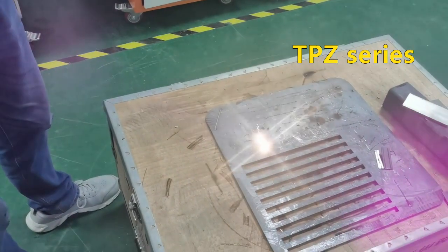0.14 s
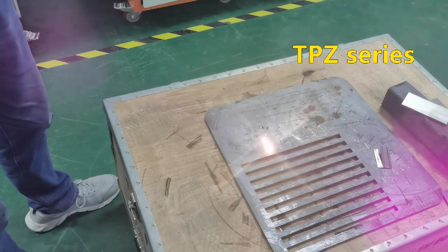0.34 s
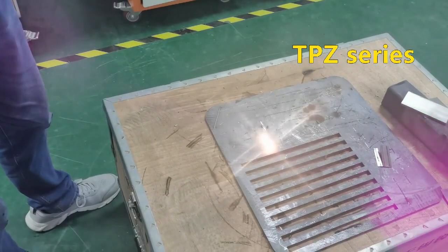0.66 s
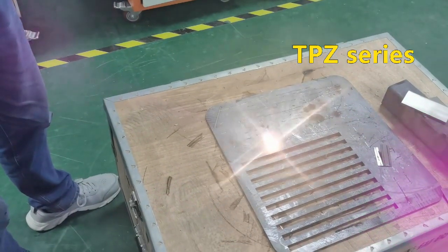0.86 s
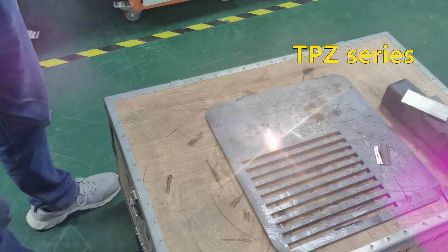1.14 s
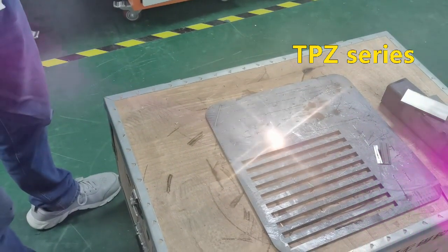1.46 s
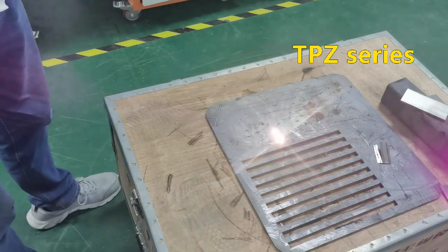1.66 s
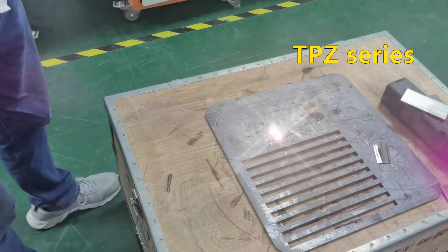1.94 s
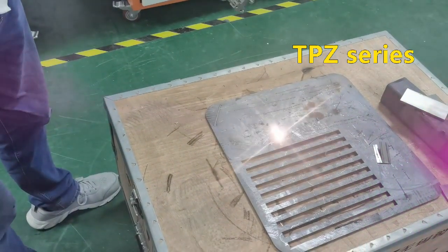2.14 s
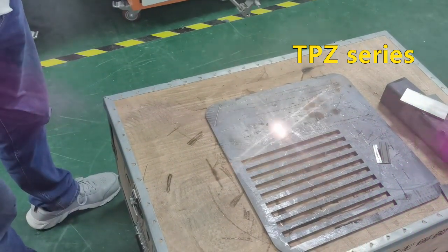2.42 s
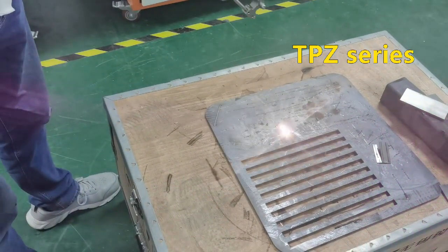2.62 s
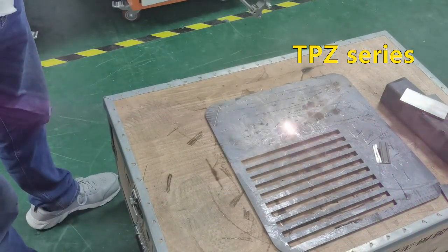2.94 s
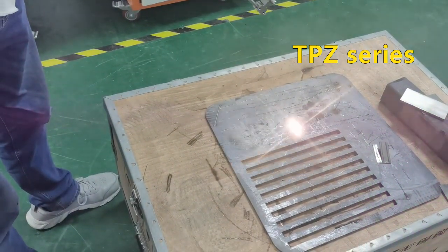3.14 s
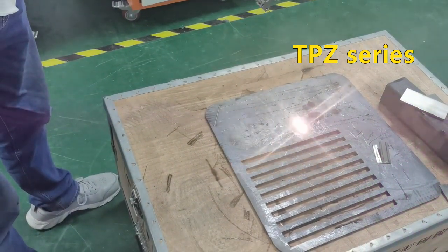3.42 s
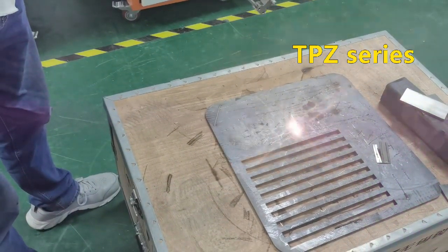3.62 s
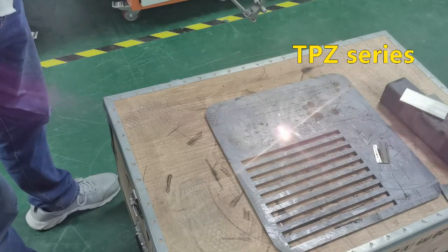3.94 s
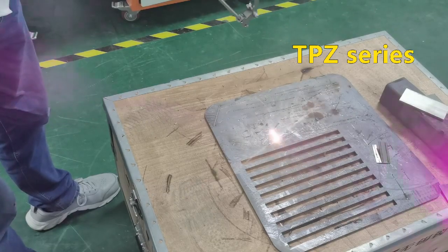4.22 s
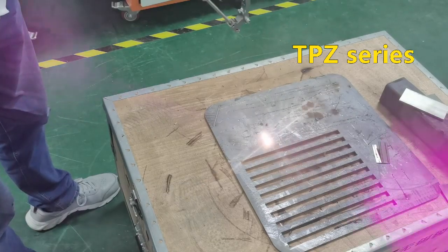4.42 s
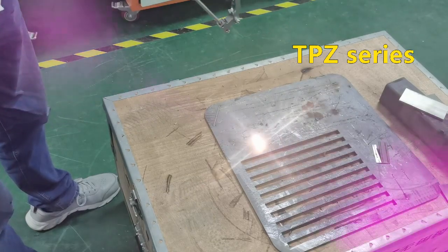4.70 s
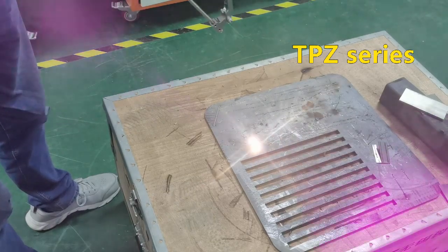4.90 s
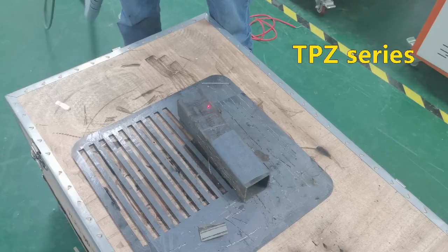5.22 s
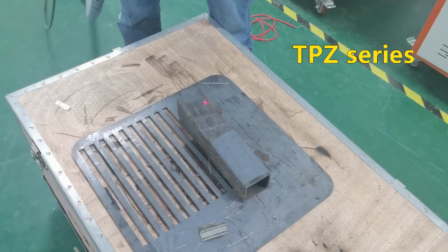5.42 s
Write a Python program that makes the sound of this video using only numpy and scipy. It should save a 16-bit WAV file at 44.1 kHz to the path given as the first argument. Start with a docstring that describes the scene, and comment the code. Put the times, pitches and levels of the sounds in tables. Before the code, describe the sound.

The sound begins mid-action with a handheld laser cleaner burning rust from a steel plate: a loud, bright, piercing sizzle around the upper treble. Its nearly repeating crackle gives it a raspy, buzzing pitch near 500 hertz, while a wavering whine sounds on multiples of that, strongest around 1 and 2 kilohertz with higher tones coming and going. From 0 to about 2.4 seconds, short flares spit and jump out, clustered near 0.9 to 1.7, with stronger bursts at 2.15 and 2.35. The burn gradually weakens and turns breathier, softest near 3.3, with a small spit at 3.8. At about 4.1 seconds it cuts off abruptly with a tiny fading tail. Quiet workshop ambience remains: deep mains hum, faint fan tones and dull air noise. Small dry ticks fall near 4.2, 4.6 (clearest), 4.7, 4.8, 5.0 and 5.5. Stereo, dry, with crisp treble.

```python
"""In a workshop, a handheld laser cleaner sweeps its beam along a line on a rusty steel plate, about 500 times
a second. Every sweep meets nearly the same rust, so the burning noise nearly repeats and the crackle sings;
the turns of the beam add a whine of low multiples of the sweep rate. The sound then cuts away from the laser,
with a brief fading tail, to another spot in the workshop: mains hum, fan tones, air noise and a few dry ticks
of decaying noise, all heard by a pair of microphones."""
import sys
import numpy as np
from scipy import signal
from scipy.fft import rfft, irfft, next_fast_len
from scipy.io import wavfile
from scipy.ndimage import uniform_filter1d, map_coordinates

SR = 44100
rng = np.random.default_rng(int(sys.argv[2]) if len(sys.argv) > 2 else 0)


def bounce(signal):
    """Save signal as a 16-bit WAV file at the path given by the first command-line argument."""
    frames = np.transpose(np.atleast_2d(signal))
    limited = np.clip(frames, -1, 1)
    pcm = np.round(limited * 32767).astype(np.int16)
    wavfile.write(sys.argv[1], SR, pcm)


def how_loud(loudness_db):
    """Turn decibels into a plain amplitude multiplier (0 dB gives 1, 20 dB gives 10)."""
    steps = np.asarray(loudness_db, float) / 20
    return 10 ** steps


N = 245195
SWEEP_HZ = 498.1
SWEEPS = int(N * SWEEP_HZ / SR) + 2  # rows in a map of the plate
CELLS = 64  # independent places along the line
SIDES = np.array([[0.5], [-0.5]])  # halves a left-right difference between the microphones


def unit(x):
    """Normalization: scales a signal to rms 1."""
    return x / np.sqrt(np.mean(x ** 2) + 1e-20)


def along(points, hz):
    """Log-frequency interpolation of (frequency [Hz], value) points."""
    f, v = np.transpose(points)
    return np.interp(np.log(hz + 1), np.log(f + 1), v)


def curves(rows):
    """Linear interpolation in time: one value per sample for each column after the time."""
    s, *columns = np.transpose(rows)
    return [np.interp(np.arange(N) / SR, s, column) for column in columns]


def wobble(rate):
    """Slow random modulation: a smooth curve through rate random knots a second."""
    knots = rng.standard_normal(int(N * rate / SR) + 4)
    return map_coordinates(knots, [np.arange(N) * rate / SR])


def filtered(x, response):
    """Linear filtering: multiplies the spectrum by a complex response of frequency."""
    m = next_fast_len(N + 8192)
    return irfft(rfft(x, m) * response(np.fft.rfftfreq(m, 1 / SR)), m)[..., :N]


def peak(hz, centre_hz, width_hz):
    """Simple resonance: the causal response of one damped mode, 1 at its centre."""
    return 1j * hz * width_hz / (centre_hz ** 2 - hz ** 2 + 1j * hz * width_hz)


def spread(pair, spectrum, alike):
    """Interchannel coherence: two unrelated signals, coloured and mixed to a left-right likeness; rms 1."""
    def mid_side(hz):
        turn = np.arccos(np.clip(along(alike, hz), -1, 1)) / 2
        return how_loud(along(spectrum, hz)) * [np.cos(turn), np.sin(turn)]

    mid, side = filtered(pair, mid_side)
    return unit(np.array([mid + side, mid - side]))


def blurred(x, length, axis):
    """Spatial correlation: a running mean taken twice, scaled to rms 1."""
    size = max(round(length), 1)
    once = uniform_filter1d(x, size, axis, mode="wrap")
    return unit(uniform_filter1d(once, size, axis, mode="wrap"))


def swept(surface):
    """Scanning: the beam reads a map of (sweep number, place on the line), one row per sweep."""
    sweeps = np.arange(N) * SWEEP_HZ / SR
    closed = np.hstack([surface, surface[:, :1]])
    return map_coordinates(closed, [sweeps, sweeps % 1 * surface.shape[1]], order=1)


def texture(memory_s):
    """Near-periodic noise: fine rust grain along the line, renewed as the hand moves on."""
    grain = blurred(rng.standard_normal((SWEEPS, CELLS)), memory_s * SWEEP_HZ, axis=0)
    return unit(swept(signal.resample(grain, 512, axis=1)))


def snap():
    """Pulse train: one sharp pressure drop where the mirror turns, its size drifting from sweep to sweep."""
    sizes = how_loud(3.7 * blurred(rng.standard_normal((SWEEPS, 1)), 3, axis=0))
    drops = -sizes * np.eye(1, CELLS)
    return unit(swept(signal.resample(drops, 512, axis=1)))


def flares(shared, flare_db, turn_db):
    """Amplitude modulation: bursts start suddenly and fade within a sweep or two; each sweep starts hot."""
    patches = blurred(rng.standard_normal(shared.shape) + 0.97 * shared, 6, axis=1)
    patches = unit(signal.lfilter([1], [1, -np.exp(-1 / 1.0)], patches, axis=0))  # fades by e each sweep
    place = np.linspace(0, 1, shared.shape[1], endpoint=False)
    return how_loud(swept(flare_db * patches + turn_db * np.exp(-place / 0.12)))


# thick scabs flaring up under the beam, a negative one dipping: (time [s], length [s], change of sizzle [dB])
SCABS = [(0.32, .005, 3), (0.362, .008, 6), (.83, 0.011, 2), (0.899, 0.033, 4.5), (1.029, 0.028, 7),
         (1.117, 0.0085, 8), (1.165, .008, -7), (1.21, .01, 3), (1.302, 0.01, 9), (1.385, 0.0056, 7),
         (1.487, .008, 4.5), (1.63, 0.035, 7), (1.943, .005, 2.5), (2.154, 0.011, 9.5), (2.28, .005, 2),
         (2.333, 0.053, 3.5), (3.793, 0.015, 4)]


def scabs():
    """Transient envelope: each scab's level change in dB rises quickly, holds and fades."""
    rise_s, fade_s = 0.0013, 0.003
    s, length_s, db = np.transpose(SCABS)[:, :, None]
    since = np.arange(N) / SR - s
    nearest_edge = np.minimum(since / rise_s, (length_s - since) / fade_s)
    return np.sum(db * np.exp(np.minimum(0, nearest_edge)), axis=0)


# burning rust: (time [s], sizzle [dB], body re sizzle [dB], top re sizzle [dB])
BURN = [(0, -23, -7, -12), (.2, -25.5, -5, -8), (.36, -24.5, -4.5, -9.5), (.52, -27.5, -6, -4),
        (.66, -27.5, -2.5, -1), (.82, -25.5, -6.5, -10), (1, -32.5, -0.5, 0), (1.06, -26, -7, -11),
        (1.3, -29, -3, -6.5), (1.6, -31.5, -3, -3), (1.88, -33, -3, 1), (2.0, -31, -1.5, 5.5),
        (2.25, -29.5, -2.5, -4), (2.36, -29, -6.5, 2), (2.5, -31.5, -0.5, 1), (2.6, -34, 1, -0.5),
        (2.97, -34, -3.5, 1.5), (3.26, -37.5, 1, 1), (3.55, -34, -0.5, 2), (3.98, -32.5, -2, 2.5),
        (4.09, -35, -1, 3)]
# share repeated from sweep to sweep, falling as the rust thins: (time [s], treble [0-1], body [0-1])
REPEAT = [(0, 1, 1), (.28, 0.9, .97), (.38, 0.58, 0.7), (.47, 0.64, 0.9), (.6, .8, 1), (.85, 0.88, 0.99),
          (1.05, 0.5, 0.88), (1.25, .72, 0.83), (1.5, 0.2, 0.68), (1.78, 0.24, 0.81), (1.95, 0.2, 0.52),
          (2.25, 0.34, 0.79), (2.45, .32, 0.78), (3, 0, 0.49), (3.55, 0.1, 0.7), (4.09, .15, 0.48)]
# body, sizzle and top bands: (low edge [Hz], high edge [Hz])
BANDS = [(0, 7000), (7000, 11200), (11200, 20000)]
# same bands: (exponent on repeated share, short-lived part of grain [0-1], flare depth [dB], turn boost [dB])
GRAIN = [(.9, 0.3, 2.2, 3), (1.1, 0.71, 2.7, 14.5), (2.2, 0.84, 3, 2.1)]
# part of a scab's level change that reaches body, sizzle, top
SCAB_SHARE = (0.46, 1, .5)
# depth of each band's own unsteadiness: body, sizzle, top [dB]
FLICKER_DB = (1.63, 1.5, 2.5)
# spectral shape of the repeated burn: (frequency [Hz], relative density [dB per Hz])
REPEATED = [(1700, -16.5), (2490, -6.5), (3000, -7.5), (3490, -9), (4000, -8.5), (4480, -5.5), (5500, -11),
            (7000, -6), (9000, -1.5), (12000, -1.5), (16000, 8)]
# spectral shape of the unrepeated burn: (frequency [Hz], relative density [dB per Hz])
FRESH = [(300, -15.5), (700, -18), (1500, -9.5), (2250, -8), (3000, -3.5), (3800, -5), (5500, -4),
         (7000, -4.5), (9000, 0), (12000, -3.5), (16000, -2.5)]
# interchannel coherence: (frequency [Hz], left-right likeness [-1 to 1])
CRACKLE_ALIKE = [(1000, 0.91), (3000, 0.58), (5500, 0.31), (9000, 0.37), (15000, 0.4)]
# interchannel level: (frequency [Hz], left-right difference [dB])
CRACKLE_PAN = [(1000, -1.5), (3000, 0.5), (4200, 1), (6400, 1), (8500, 6.5), (10500, -9), (15000, -3)]
# interchannel phase: (frequency [Hz], left lead [rad])
CRACKLE_LEAD = [(1000, -1.5), (4500, 1), (6500, -1.5), (8400, -2.5), (9500, -5), (10900, -3.5),
                (12700, -1.5), (14000, -1)]


def crackle():
    """Repetition pitch: part of the burn repeats from sweep to sweep, part lasts a sweep or two at most."""
    sizzle_db, body_db, top_db = curves(BURN)
    treble_repeat, body_repeat = curves(REPEAT)
    scab_db = scabs()
    # louder flares sound more tonal: more of the burn repeats
    treble_repeat = treble_repeat + 0.1 * scab_db

    lasting = np.array([texture(memory_s=0.091) for _ in "LR"])
    lasting = unit(lasting + 0.58 * snap() * [[1], [0.3]])
    brief = np.array([texture(memory_s=0.012) for _ in "LR"])
    fleeting = np.array([texture(memory_s=0.0045) for _ in "LR"])
    fresh = unit(rng.standard_normal((2, N)) + 0.75 * fleeting)
    shared = rng.standard_normal((SWEEPS, CELLS))  # rust patches common to all bands

    repeats = (body_repeat, treble_repeat, treble_repeat)
    levels_db = [db + part * scab_db + depth_db * wobble(28.056)
                 for db, part, depth_db in zip((body_db, 0, top_db), SCAB_SHARE, FLICKER_DB)]
    out = np.zeros((2, N))
    for (low_hz, high_hz), level_db, repeat, grain in zip(BANDS, levels_db, repeats, GRAIN):
        power, short, flare_db, turn_db = grain
        share = np.clip(repeat, 0, 1) ** power
        flare = flares(shared, flare_db, turn_db)
        again = np.sqrt(1 - short) * lasting + np.sqrt(short) * brief
        burn = np.sqrt(share) * spread(flare * again, REPEATED, CRACKLE_ALIKE)
        burn += np.sqrt(1 - share) * spread(flare * fresh, FRESH, CRACKLE_ALIKE)
        band = lambda hz: ((1 + (low_hz / (hz + 1)) ** 20) * (1 + (hz / high_hz) ** 20)) ** -0.5
        out += how_loud(level_db) * unit(filtered(burn, band))

    def paths(hz):
        return how_loud(along(CRACKLE_PAN, hz) * SIDES) * np.exp(1j * along(CRACKLE_LEAD, hz) * SIDES)

    return filtered(how_loud(sizzle_db) * out, paths)


# multiples of the sweep rate in the whine
ORDER = (1, 2, 3, 4, 6, 8)
# the two turns differ: (time [s], 1st multiple [dB])
UNEVEN_TURNS = [(0, -45.5), (.33, -43.5), (.56, -52), (.74, -44), (.93, -70), (1.13, -44.5), (1.22, -62),
                (1.45, -80), (1.56, -50.5), (1.82, -48.5), (1.89, -62), (2.1, -46.5), (2.26, -68),
                (2.36, -54), (2.48, -57), (2.7, -44.5), (3.02, -48.5), (3.35, -59), (3.52, -50),
                (3.96, -51), (4.09, -63)]
# both turns alike: (time [s], 2nd multiple [dB], 4th multiple [dB])
EVEN_TURNS = [(0.0, -29.5, -32.5), (0.08, -34, -44.5), (0.42, -28, -31.5), (0.57, -40.5, -44),
              (0.59, -38, -42.5), (0.86, -42.5, -51), (1.05, -34, -36), (1.16, -39.5, -37.5),
              (1.2, -40, -44), (1.33, -36, -36), (1.59, -41, -40), (1.8, -39, -34.5), (1.9, -48, -46),
              (1.95, -40, -35.5), (2.6, -39.5, -40), (2.68, -38, -34), (2.77, -40, -39), (3.98, -34.5, -39),
              (4.05, -37.5, -36.5), (4.09, -50, -47)]
# upper whine: (time [s], 6th multiple [dB], 8th multiple [dB])
UPPER = [(0.0, -44, -27), (0.09, -61, -49), (0.45, -30.5, -35.5), (0.51, -41, -58.5), (0.69, -60, -34),
         (1.26, -53, -56), (1.34, -28, -54), (1.4, -40, -47), (2.65, -43.5, -45), (3.13, -41, -53.5),
         (3.51, -34.5, -39), (4.05, -42.5, -40.5), (4.09, -49, -52)]
# each multiple between the microphones: (left-right difference [dB], extra left lag [rad])
PLACE = [(-1.7, 0.39), (-2, 0.24), (7, 1.4), (-1.5, -0.45), (-3.5, 0.38), (2, -0.48)]
# the spot wanders over the plate: (time [s], left lag [microseconds])
LAG = [(0, 89), (.5, 53), (1, 60), (1.5, 36), (2, 140), (2.5, 125), (3, 44), (3.5, 58), (4.1, 18)]


def whine():
    """Harmonic series: the beam slows and turns at both ends, giving fluttering multiples of the sweep rate."""
    t = np.arange(N) / SR
    (lag_us,), (first,) = curves(LAG), curves(UNEVEN_TURNS)
    (second, fourth), (sixth, eighth) = curves(EVEN_TURNS), curves(UPPER)
    # the 3rd gains on the 1st as the 4th gains on the 2nd
    third = first + 0.5 + 0.99 * (fourth - second)
    levels_db = (first, second, third, fourth, sixth, eighth)
    flutter = wobble(35)  # common to all multiples
    out = np.zeros((2, N))
    for k, level_db, (pan_db, extra_lag) in zip(ORDER, levels_db, PLACE):
        jitter = np.sqrt(k) * (0.19 * wobble(30) + 0.06 * wobble(130))
        phase = 2 * np.pi * k * SWEEP_HZ * t + np.pi + jitter
        lag = 2 * np.pi * k * SWEEP_HZ * lag_us * 1e-6 + extra_lag
        flutter_db = 1.4 * flutter + 0.57 * wobble(40) + 1.97 * wobble(140)
        gain = np.sqrt(2) * how_loud(level_db + flutter_db)  # sqrt(2): levels are rms
        sway = 0.16 * np.array([wobble(25.39), wobble(24.8)])
        out += gain * how_loud(pan_db * SIDES) * np.sin(phase - lag * SIDES + sway)
    return out


# dry contacts: (time [s], body drive [dB before 4 dB gain], treble drive [dB re puff, before 15 dB gain],
# left-right difference [dB], decay by 60 dB [s])
TICKS = [(4.1665, -43, -19, 2, 0.013), (4.568, -27, -14, 1, 0.011), (4.6994, -47, -10, 3, 0.018),
         (4.778, -42, -23, 4, 0.015), (5.0394, -41, -17, -1, 0.018), (5.5433, -41, -11, 1, 0.013)]
# resonances of the small body: (centre [Hz], width [Hz], gain [dB])
TICK_BODY = [(1670, 310, 13.5), (3250, 920, 1)]


def ticks():
    """Impact excitation: small dry contacts, brief decaying noise in a small body with a treble edge."""
    dull, sharp = np.zeros((2, N + SR)), np.zeros((2, N + SR))
    t = np.arange(SR // 10) / SR
    for s, db, treble_db, pan_db, t60 in TICKS:
        envelope = how_loud(db - 60 * t / t60)
        puff = envelope * how_loud(pan_db * SIDES) * rng.standard_normal((2, len(t)))
        start = round(s * SR)
        dull[:, start:start + len(t)] += how_loud(4) * puff
        sharp[:, start:start + len(t)] += how_loud(treble_db + 15) * puff

    def body(hz):  # neighbouring modes have opposite signs
        return sum((-1) ** k * how_loud(db) * peak(hz, c, w) for k, (c, w, db) in enumerate(TICK_BODY))

    edge = lambda hz: peak(hz, 9200, 3000)
    return filtered(dull[:, :N], body) + filtered(sharp[:, :N], edge)


# hum and fan tones before a common 1.5 dB gain: (frequency [Hz], before the cut [dB], after it [dB])
HUM = [(101, -57, -48), (141.9, -58.5, -58.5), (198, -52, -49.5), (223.6, -61.5, -81), (278.2, -66, -63),
       (300.7, -58.5, -52), (380, -94, -77), (834, -56.5, -61.5), (886, -86, -56.5), (945, -60, -57),
       (1049.5, -56.5, -60), (1146, -76.5, -62.5)]
# air noise shape before the cut: (frequency [Hz], relative density [dB per Hz])
AIR_BEFORE = [(15, -95), (25, -106), (60, -76.5), (125, -77), (250, -70), (350, -81.5), (600, -76.5),
              (760, -81), (960, -72.5), (1200, -78.5), (2200, -81.5), (5000, -85.5)]
# air noise shape after the cut: (frequency [Hz], relative density [dB per Hz])
AIR_AFTER = [(15, -98), (40, -71), (125, -78.5), (250, -73.5), (350, -79), (600, -82), (950, -77.5),
             (1400, -80.5), (2000, -81), (2300, -85), (3500, -91), (4300, -92), (6000, -100), (9000, -101),
             (16000, -108)]
# air noise level: (before the cut [dB], after it [dB])
AIR_DB = (-42, -44.5)
# interchannel coherence of the air noise: (frequency [Hz], left-right likeness [-1 to 1])
AIR_ALIKE = [(30, 0.52), (100, 1), (290, 0.86), (640, 0.62), (1400, -0.29), (3100, -0.091), (7000, -0.01)]


def workshop():
    """Superposition: hum, fan tones and air noise, crossfaded at the cut to another spot in the workshop."""
    t = np.arange(N) / SR
    after = np.interp(t, [4.09, 4.11], [0, 1])
    out = np.zeros((2, N))
    for hz, before_db, after_db in HUM:
        level_db = before_db + (after_db - before_db) * after
        waver = how_loud(level_db + 1.5 + 0.87 * wobble(7))
        drift = 0.48 * wobble(6) + 0.21 * np.array([wobble(2.76), wobble(7.0)])
        out += waver * np.sin(2 * np.pi * (hz * t + rng.random()) + drift)
    air_before, air_after = [
        how_loud(db + 0.69 * wobble(2.5)) * spread(rng.standard_normal((2, N)), spectrum, AIR_ALIKE)
        for db, spectrum in zip(AIR_DB, (AIR_BEFORE, AIR_AFTER))]
    return out + (1 - after) * air_before + after * air_after


# the sound cuts away from the laser, with a brief fading tail: (time [s], gain [dB])
CUT = [(0, 2), (4.0945, 1), (4.0955, -11), (4.106, -16), (4.112, -55)]


def scene():
    """Superposition: the laser, faded out at the cut, over the ticks and the workshop."""
    (cut_db,) = curves(CUT)
    return how_loud(cut_db) * (crackle() + whine()) + ticks() + workshop()


def low_pass(x):
    """Removes everything above the highest recorded frequency."""
    return signal.sosfilt(signal.butter(12, 16390, fs=SR, output="sos"), x)


# resonance of the microphone ports: (centre [Hz], width [Hz], lift [dB])
PORT = (9000, 600, 5.5)


def record(dry):
    """Port resonance: the microphone ports lift the treble, below a sharp band limit."""
    top_hz = 15900
    centre_hz, width_hz, lift_db = PORT
    ports = lambda hz: (1 + (how_loud(lift_db) - 1) * peak(hz, centre_hz, width_hz)) * (hz < top_hz)
    mix = filtered(dry, ports)
    return low_pass(mix)


dry = scene()
out = record(dry)
bounce(out)
```